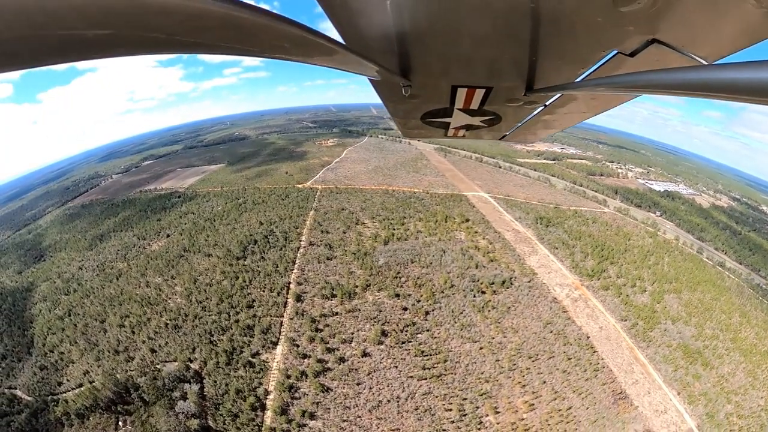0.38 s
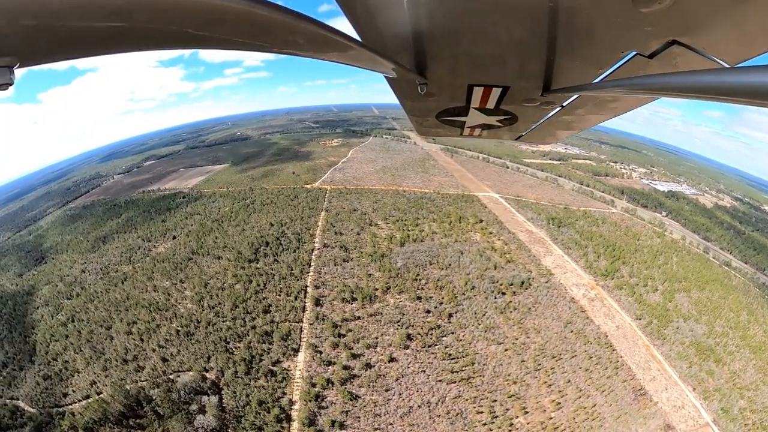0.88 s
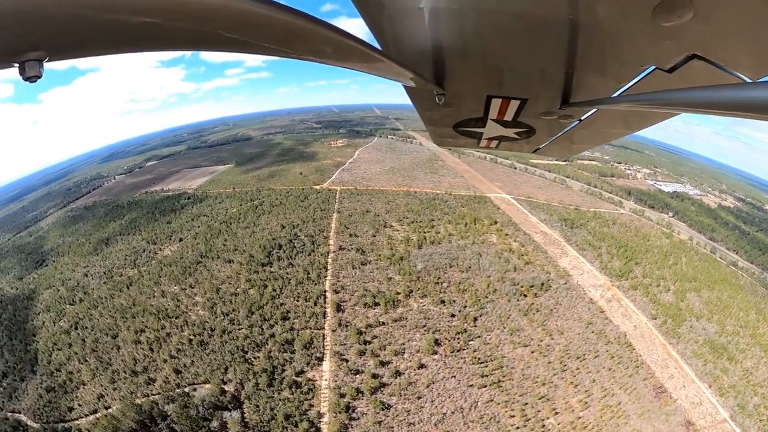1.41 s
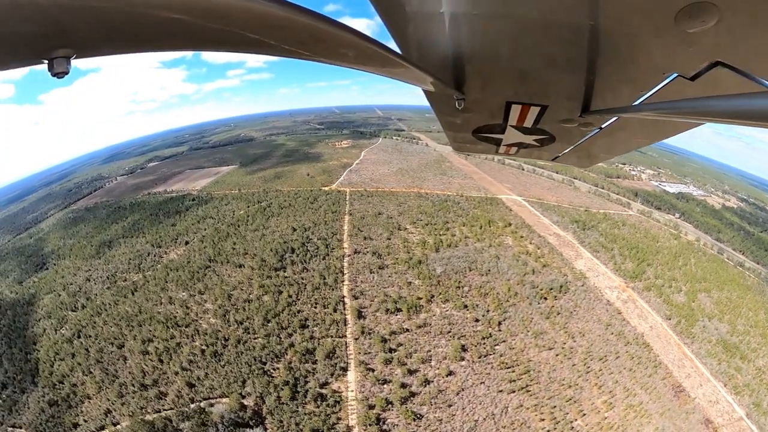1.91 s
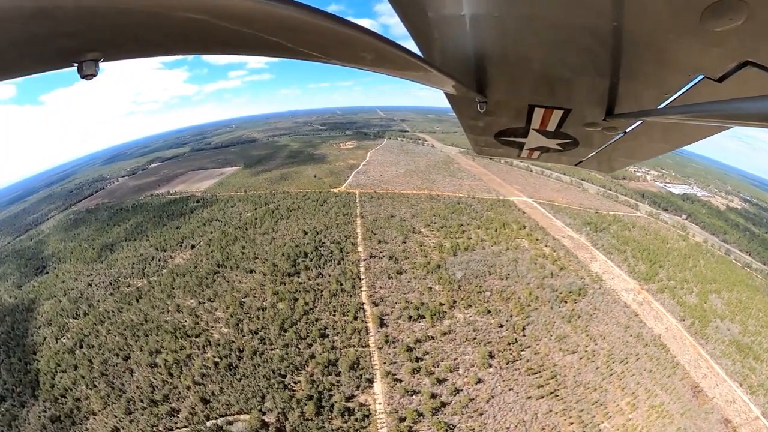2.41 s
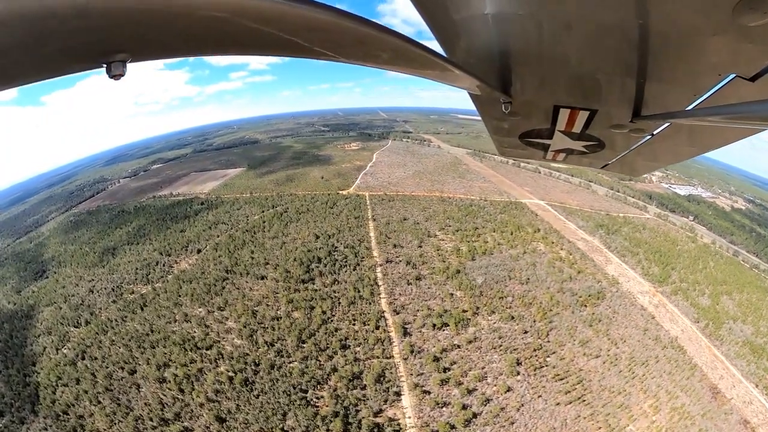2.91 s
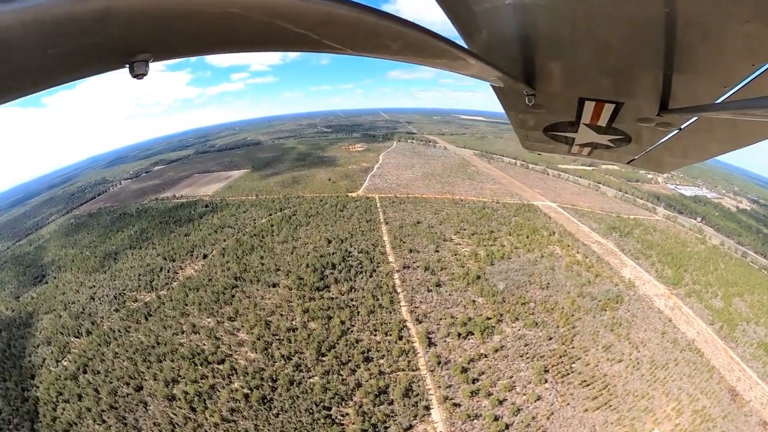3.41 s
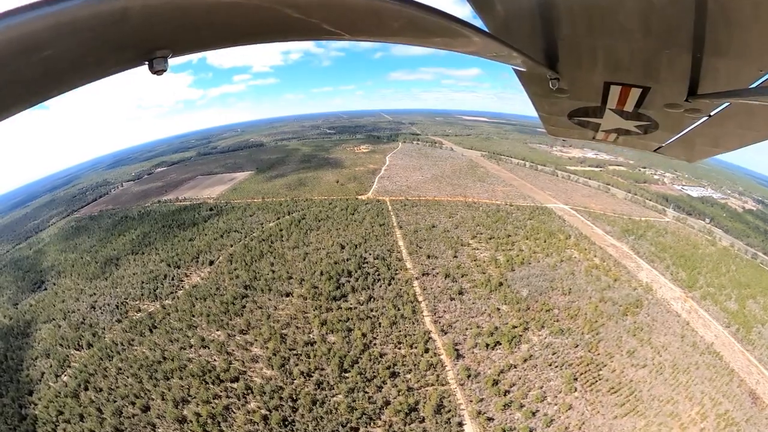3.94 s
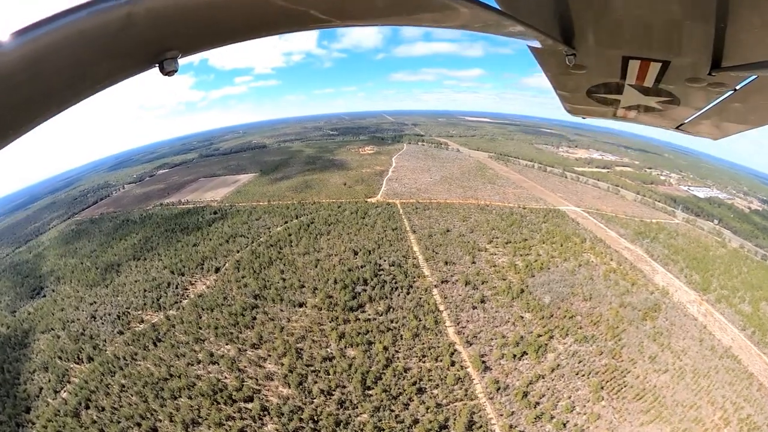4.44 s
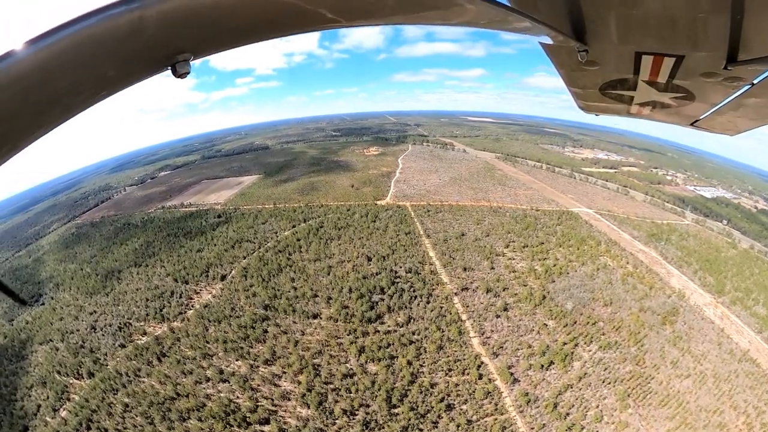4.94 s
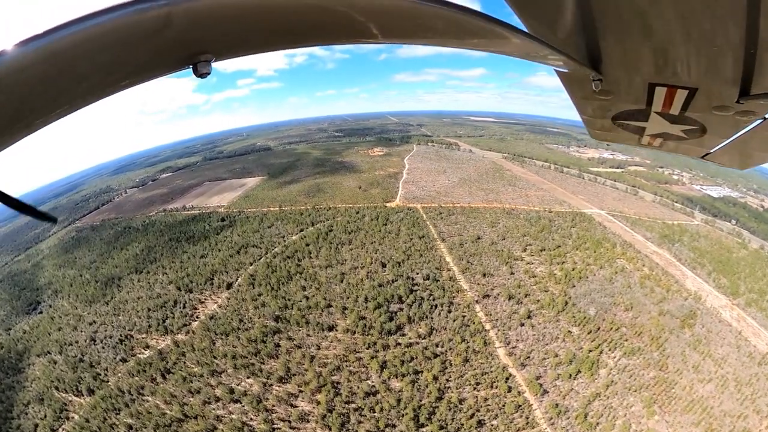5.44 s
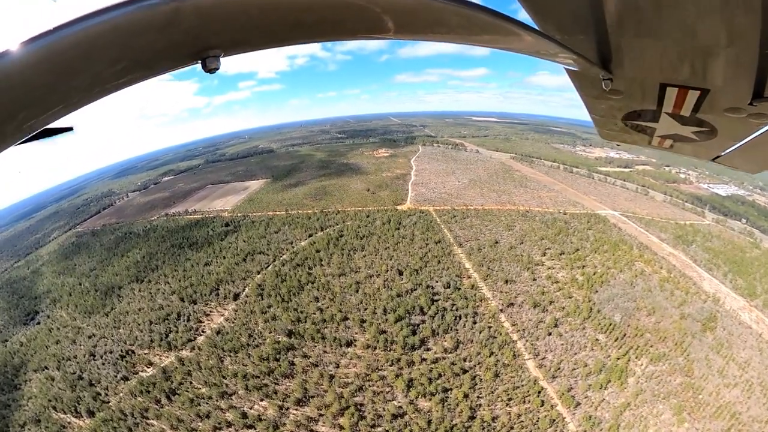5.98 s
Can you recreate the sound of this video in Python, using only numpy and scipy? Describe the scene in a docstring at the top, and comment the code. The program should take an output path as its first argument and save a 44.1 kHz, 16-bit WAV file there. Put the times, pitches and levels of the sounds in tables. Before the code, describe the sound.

Heavy wind rumble buffets a microphone under a light aeroplane's wing while propeller wash throbs rapidly and the engine's bright exhaust hiss fades darker.

```python
"""Under the wing of a light aeroplane, close to the airflow, while the throttle is eased back.
Wind noise is shaped into a deep rumble, a boom, a lumpy roar and sharp slaps on the microphone.
Propeller wash is hiss throbbing twice a turn; exhaust hiss chuffs once a turn, then fades and darkens.
Sines make a faint engine hum and, at the start, the ringing ticks of a loose panel.
Gain control holds down bass peaks, and the treble drops out briefly now and then."""
import sys
import numpy as np
from scipy import signal
from scipy.fft import rfft, irfft, next_fast_len
from scipy.io import wavfile
from scipy.ndimage import uniform_filter1d

SR = 44100
rng = np.random.default_rng(int(sys.argv[2]) if len(sys.argv) > 2 else 0)


def digitize_waveform(pressure):
    """Quantize a signal to 16-bit integers and store it at the path in sys.argv[1].

    Rows of a 2-D input are taken as channels; values are limited to [-1, 1].
    """
    field = np.atleast_2d(pressure).T
    bounded = np.clip(field, -1, 1)
    quanta = np.round(bounded * 32767).astype(np.int16)
    wavfile.write(sys.argv[1], SR, quanta)


def amplitude_ratio(level_db):
    """Convert a level in decibels to the matching linear amplitude (field) ratio."""
    exponent = np.asarray(level_db, float) / 20
    return 10 ** exponent


N = 268551
T = np.arange(N) / SR


def evened(x):
    """Scales to rms 1."""
    return x / np.sqrt(np.mean(x ** 2) + 1e-20)


def read(points, hz):
    """Reads a spectrum on a log-frequency axis."""
    f, value = np.transpose(points)
    return np.interp(np.log(hz + 1), np.log(f + 1), value)


def curve(rows, t, column=1):
    """Reads one column of a table in time."""
    rows = np.asarray(rows)
    return np.interp(t, rows[:, 0], rows[:, column])


def noise(spectrum, size, patchy_db, tilt=None):
    """Noise of rms 1 with drifting spectral patches; tilt(t) is a slope in dB per octave above 6 kHz."""
    hop = size // 4
    frames, hz = N // hop + 5, np.fft.rfftfreq(size, 1 / SR)
    real, imaginary, patches = rng.standard_normal((frames, len(hz), 3)).T
    patches = uniform_filter1d(patches, size=10, axis=0)  # blur across frequency
    patches = evened(uniform_filter1d(patches, size=12, axis=1))  # blur across time
    level_db = read(spectrum, hz)[:, None] + patchy_db * patches
    if tilt:
        octaves = np.log2(np.maximum(hz / 6000, 1))
        level_db += octaves[:, None] * tilt(np.arange(frames) * hop / SR)
    spectra = (real + 1j * imaginary) * amplitude_ratio(level_db)
    return evened(signal.istft(spectra, nperseg=size, noverlap=size - hop)[1][:N])


def flutter(hz):
    """Random turbulence slower than hz, rms 1."""
    return evened(signal.lfilter(*signal.butter(2, hz, fs=SR), rng.standard_normal(N)))


def bands(x, rows):
    """Splits a sound into overlapping bands around the first column; they sum to the whole."""
    z, hz, centres = rfft(x), np.fft.rfftfreq(N, 1 / SR), np.transpose(rows)[0]
    return [irfft(z * np.interp(hz, centres, one), N) for one in np.eye(len(rows))]


# crankshaft speed as the engine slows: [t/s, speed/turns per s]
SHAFT_SPEED = [(0.0, 23.39), (0.3, 22.28), (0.6, 21.66), (1.2, 21.34), (2.1, 18.71), (2.5, 18.12),
               (3.5, 17.56), (4.5, 17.86), (5.0, 17.88), (5.5, 17.59), (6.09, 17.66)]


def shaft_turns():
    """Adds up shaft speed into the number of turns made."""
    return np.cumsum(curve(SHAFT_SPEED, T)) / SR


def engine_effort():
    """Effort runs from 0 at cruise speed to 1 at climb speed."""
    cruise, climb = 17.5, 23.4  # turns per s
    return np.clip((curve(SHAFT_SPEED, T) - cruise) / (climb - cruise), 0, 1)


# relative spectrum of wind pressure on the microphone: [f/Hz, level/dB per Hz]
RUMBLE_SPECTRUM = [(8.8, -39.5), (15, -13.5), (54, 1), (122, -0.5), (160, -4), (200, -1.5), (240, -4.5),
                   (280, -9.5), (367, -18), (500, -29), (650, -38), (1100, -120)]
# relative spectrum of wind booming in a hollow of the mount: [f/Hz, level/dB per Hz]
HOLLOW_SPECTRUM = [(85, -44.5), (108, -3.5), (121, 0.5), (140, -5), (165, -35), (300, -100)]
# slow wander of the rumble's lowest and highest parts: [t/s, level near 30 Hz/dB, level near 330 Hz/dB]
RUMBLE_WANDER = [(0, 0.5, 1), (.6, -2, -1), (1.1, 0, 1.5), (1.6, 1, -0.5), (2, -1, 0), (2.5, 0, 2.5),
                 (3.1, 1.5, 0), (3.9, 1.5, 0), (4.4, 0, 0), (4.9, -1, -0.5), (5.3, -1, .5), (5.7, -0.5, -1),
                 (6.09, 0, -1)]
# centres of the rumble's four parts: [f/Hz]
RUMBLE_BANDS = [(30,), (80,), (200,), (330,)]


def rumble():
    """Large eddies press on the microphone, and wind booms in a hollow of the mount."""
    boom_db = -22 - 0.5 * flutter(0.67)  # slow random swells
    boom = amplitude_ratio(boom_db) * noise(HOLLOW_SPECTRUM, size=4096, patchy_db=0.5)
    deep, low, middle, upper = bands(noise(RUMBLE_SPECTRUM, size=2048, patchy_db=0.88), RUMBLE_BANDS)
    deep = deep * amplitude_ratio(curve(RUMBLE_WANDER, T))
    upper = upper * amplitude_ratio(curve(RUMBLE_WANDER, T, column=2))
    surge_db = 1.02 * flutter(0.49)
    return amplitude_ratio(-11.5 + surge_db) * (deep + low + middle + upper) + boom


# gustiness around the mean, shared by roar, wash and small slaps: [t/s, level/dB]
GUST_LEVEL = [(0, -0.5), (.5, -3), (.95, 0.7), (1.25, -2), (1.65, 0.5), (1.85, -2), (2.5, 0.5), (3.2, 0.5),
              (3.8, -0.5), (4.0, 0.5), (4.2, 3), (4.42, 1), (4.6, -0.8), (5.3, -1), (5.7, -3), (6.09, -0.1)]
# relative spectrum of gusts roaring past the housing: [f/Hz, level/dB per Hz]
ROAR_SPECTRUM = [(200, -28.5), (350, -4), (500, -5.5), (800, -13.5), (1300, -23), (2500, -34.5),
                 (5000, -63), (9000, -110)]


def roar():
    """Middling eddies that come in lumps and follow the gusts."""
    lumps_db = 0.98 * flutter(40)
    return amplitude_ratio(-34.5 + curve(GUST_LEVEL, T) + lumps_db) * noise(ROAR_SPECTRUM, size=1024, patchy_db=0.5)


# relative spectrum of propeller wash over the wing: [f/Hz, level/dB per Hz]
WASH_SPECTRUM = [(500, -29), (900, -7), (1400, -9), (2300, -12.5), (4000, -15), (6400, -24), (8000, -36),
                 (11000, -49), (13500, -64), (15500, -93)]
# the blade gust mostly lands later in the treble: [f/Hz, depth/dB, lag/blade passes]
BLADE_THROB = [(1300, 1.6, 0), (2800, 1.9, 0), (5200, 1.7, .12), (8000, 1.4, .12)]
# the gust slips later against the shaft as the slipstream slows: [t/s, lag/blade passes]
SLIPSTREAM_LAG = [(0, -.12), (1.25, -.15), (1.75, .1), (2.25, .2), (4, .21), (6.09, .3)]


def propeller_wash(turns):
    """Small eddies; each of the two blades throws a denser gust."""
    passes = 2 * turns - curve(SLIPSTREAM_LAG, T)
    air = np.zeros(N)
    for part, (_, depth_db, lag) in zip(bands(noise(WASH_SPECTRUM, size=512, patchy_db=1.17), BLADE_THROB),
                                        BLADE_THROB):
        air += part * amplitude_ratio(depth_db * np.cos(2 * np.pi * (passes - lag)))
    gust_db = 0.4 * curve(GUST_LEVEL, T)  # wash follows the gusts only partly
    return amplitude_ratio(-44.5 + gust_db + 0.28 * flutter(57)) * air


def darkening(t):
    """Hiss slope above 6 kHz in dB per octave, settling from bright to dark."""
    first, last, settling_s = 5, -13.5, 0.93
    return last + (first - last) * np.exp(-t / settling_s)


def chuff(turns):
    """A peaked throb, once a turn."""
    return np.cos(2 * np.pi * turns) + .35 * np.cos(4 * np.pi * turns)


# relative spectrum of the exhaust hiss before darkening: [f/Hz, level/dB per Hz]
HISS_SPECTRUM = [(2500, -27), (4000, -6.5), (5500, -1.5), (7600, -2), (9300, -9), (12000, -19),
                 (14300, -38), (15800, -55)]
# the chuff is deepest near the top of the hiss and comes early there: [f/Hz, share of depth, lead/turns]
CHUFF_THROB = [(4500, .1, .08), (6000, .7, .12), (7700, 1.15, .22), (10000, 1.3, .32), (13000, .5, .3)]


def exhaust(turns):
    """Hot gas jets out; the nearest stub chuffs once a turn, and the hiss grows with engine effort."""
    deep_db, faint_db, blur_at_s, blur_s = 3.2, .6, .8, .3  # the chuff blurs around this moment
    depth_db = faint_db + (deep_db - faint_db) / (1 + np.exp((T - blur_at_s) / blur_s))
    depth_db = depth_db * (1 + .2 * flutter(6.8))
    hiss = noise(HISS_SPECTRUM, size=512, patchy_db=1.25, tilt=darkening)
    jet = np.zeros(N)
    for part, (_, share, lead) in zip(bands(hiss, CHUFF_THROB), CHUFF_THROB):
        jet += part * amplitude_ratio(share * depth_db * chuff(turns + lead))
    level_db = -60.5 + 15 * engine_effort() ** 0.5
    return amplitude_ratio(level_db + 0.24 * flutter(25)) * jet


# faint propeller and firing hum: [multiple of shaft speed, level/dB rms]
HUM_PARTIALS = [(2, -44), (4, -33.5), (6, -38.5)]


def hum(turns):
    """Sines at low multiples of the shaft speed, nearly buried in wind."""
    out = np.zeros(N)
    for multiple, db in HUM_PARTIALS:
        out += amplitude_ratio(db) * np.sqrt(2) * np.cos(2 * np.pi * (multiple * turns + rng.random()))
    return out


# a loose panel ticking: [t/s, level before decay/dB, f/Hz]
PANEL_TICKS = [(0.016, -25.5, 2360), (0.1007, -33, 2460), (0.168, -31, 2280), (0.188, -31, 2620),
               (0.2756, -41, 2040), (0.3436, -36, 2500), (0.3661, -31, 2330)]


def panel_ticks():
    """Each tick is a short damped ring of two panel modes."""
    out = np.zeros(N)
    for s, db, hz in PANEL_TICKS:
        t = np.maximum(T - s, 0)
        envelope = amplitude_ratio(db - 60 * t / 0.016) * (1 - np.exp(-t / 0.00043))  # falls 60 dB in 16 ms
        overtone = amplitude_ratio(-6.5) * np.sin(2 * np.pi * 1.45 * hz * t)
        out += envelope * (np.sin(2 * np.pi * hz * t) + overtone)
    return out


def jolt(spectrum):
    """One click of the given colour, energy 1, peaking at its middle."""
    click = irfft(amplitude_ratio(read(spectrum, np.fft.rfftfreq(1024, 1 / SR))))
    click = np.roll(click, 512) * np.hanning(1024)
    return click / np.linalg.norm(click)


# relative spectrum of a dull slap: [f/Hz, level/dB per Hz]
DULL_SPECTRUM = [(250, -12.5), (450, 13), (900, -2.5), (1500, -20), (2300, -26), (3500, -36.5),
                 (8000, -100)]
# relative spectrum of a bright slap: [f/Hz, level/dB per Hz]
BRIGHT_SPECTRUM = [(400, -14), (900, 0), (1400, -1), (2500, -13), (5000, -23), (8000, -45), (13000, -92)]


def patter(dull, bright):
    """Small eddies strike at random and follow the gusts."""
    rate_per_s, floor_db, spread_db, rise_s, share = 25, -45.5, 4, 0.0034, 0.3  # share: bright colour
    size_db = floor_db + curve(GUST_LEVEL, T) + spread_db * np.minimum(rng.exponential(size=N), 4)
    starts = amplitude_ratio(size_db) * (rng.random(N) < rate_per_s / SR)
    u = T[:2000] / rise_s
    envelope = signal.oaconvolve(starts, u * np.exp(1 - u))[:N]
    return envelope * ((1 - share) * dull + share * bright)


# sharp eddies slapping the microphone: [t/s, level/dB rms, rise time/s, share of bright colour 0-1]
EDDY_SLAPS = [(1.456, -23.5, .007, .22), (1.483, -38, .007, .5), (1.533, -42, .002, .5),
              (1.5665, -23.5, .0025, .28), (1.585, -30, .008, 0), (1.618, -30, .004, 0),
              (1.637, -29, .002, .2), (1.684, -31, .002, .05), (2.355, -33, .003, .05),
              (3.867, -29, .003, .05), (3.949, -30.5, .005, .35), (3.966, -27, .004, 0),
              (4.112, -30, .003, .05), (4.136, -29, .004, 0), (4.189, -37, .004, .6),
              (4.28, -33, .004, .05), (4.366, -24.5, .006, .08), (4.374, -36, .004, .2),
              (5.107, -41, .003, .5), (5.24, -30, .003, 0), (5.295, -32, .007, .25), (5.593, -36, .003, .4)]


def slaps():
    """A pressure jolt inside a short puff of noise, duller or brighter, over a patter of small puffs."""
    dull = noise(DULL_SPECTRUM, size=512, patchy_db=1.1)
    bright = noise(BRIGHT_SPECTRUM, size=512, patchy_db=1.1)
    out = patter(dull, bright)
    for s, db, rise_s, share in EDDY_SLAPS:
        shape = np.exp(-.5 * ((T - s - rise_s) / rise_s) ** 2)
        puff = shape * ((1 - share) * dull + share * bright)
        snap = (1 - share) * jolt(DULL_SPECTRUM) + share * jolt(BRIGHT_SPECTRUM)
        size = amplitude_ratio(db) * np.linalg.norm(shape)
        at = round((s + rise_s) * SR) - len(snap) // 2
        sudden = .35 * .002 / rise_s  # the jolt's share of energy, less in longer slaps
        out += np.sqrt(1 - sudden) * size * puff / np.linalg.norm(puff)
        out[at:at + len(snap)] += np.sqrt(sudden) * size * snap / np.linalg.norm(snap)
    return out


def scene():
    """Wind, propeller wash, engine and panel at one microphone."""
    turns = shaft_turns()
    wind = rumble() + roar() + slaps()
    engine = propeller_wash(turns) + exhaust(turns) + hum(turns)
    return (wind + engine + panel_ticks())[None]


def limited(x, knee_db, share, recover_db, split_hz):
    """Fast gain control rides the peaks of the bass and leaves the treble alone."""
    bass = signal.oaconvolve(x, signal.firwin(1001, split_hz, fs=SR)[None], "same")
    level_db = 20 * np.log10(abs(signal.hilbert(bass, next_fast_len(N))[..., :N]) + 1e-9)
    fall = T * recover_db  # recovery in dB per s
    held_db = np.maximum.accumulate(level_db + fall, axis=-1) - fall
    over_db = np.maximum(held_db - knee_db, 0)
    gain = amplitude_ratio(-share * uniform_filter1d(over_db, size=400))
    return x - bass * (1 - gain)


# the treble drops out briefly but for one thin band: [t/s, lower edge f/Hz, half length/s, thin band f/Hz]
TREBLE_DROPOUTS = [(.465, 1000, .021, 5600), (1.382, 1800, .021, 5600), (1.702, 1600, .021, 2800),
                   (1.894, 2100, .021, 3500), (2.257, 2500, .021, 6900), (2.747, 1500, .021, 2400),
                   (2.897, 2800, .021, 4650), (2.939, 2200, .021, 4300), (3.441, 2200, .032, 4450),
                   (3.771, 2500, .021, 3200), (4.113, 1800, .021, 4150), (4.305, 2600, .021, 4150),
                   (4.774, 2100, .021, 3400), (5.585, 2000, .021, 2200)]


def dropped(x):
    """The treble fades out and back within a few hundredths of a second."""
    hz, t, z = signal.stft(x, SR, nperseg=256, noverlap=192, boundary="even")
    lost = np.zeros(z.shape[1:])
    for s, edge_hz, half_s, thin_hz in TREBLE_DROPOUTS:
        keep = np.clip(abs(t - s) - half_s + .021, 0, .021) / .021  # 21 ms fades
        above = np.clip((hz - edge_hz) / 300, 0, 1)
        above = above * (1 - np.exp(-((hz - thin_hz) / 200) ** 2))  # spare the thin band
        lost = np.maximum(lost, np.outer(above, 1 - np.sin(np.pi / 2 * keep)))
    return x - signal.istft(z * lost, SR, nperseg=256, noverlap=192)[1][..., :N]


def low_pass(x):
    """Removes everything above the highest recorded frequency."""
    return signal.sosfilt(signal.butter(12, 15710, fs=SR, output="sos"), x)


def record(dry):
    """Bass gain control, then brief treble dropouts."""
    tamed = limited(dry, knee_db=-8, share=0.66, recover_db=302.5, split_hz=600)
    mix = dropped(tamed)
    return low_pass(mix)


dry = scene()
out = record(dry)
digitize_waveform(out)
```